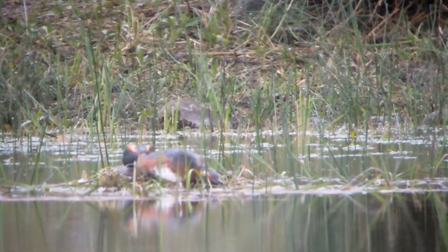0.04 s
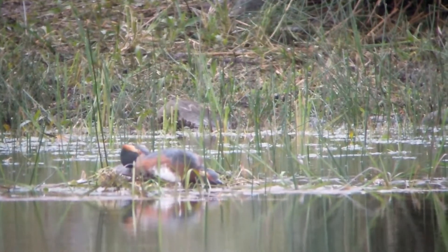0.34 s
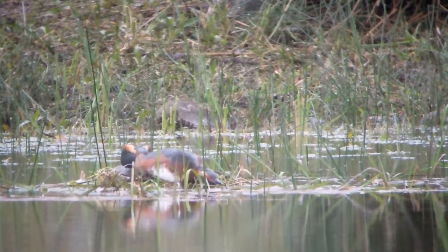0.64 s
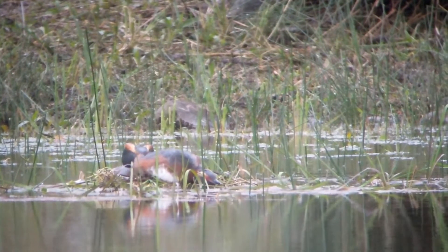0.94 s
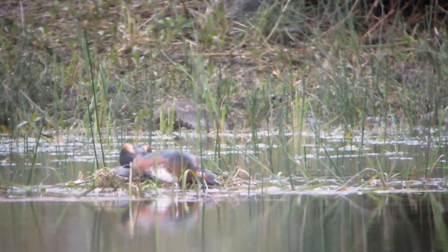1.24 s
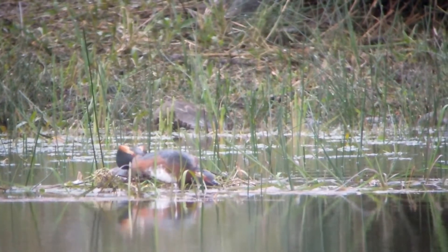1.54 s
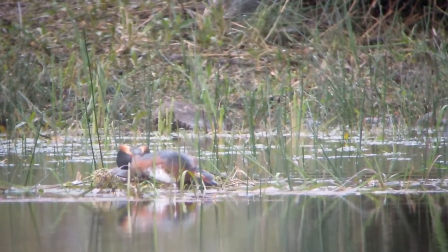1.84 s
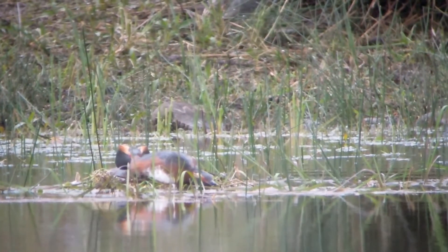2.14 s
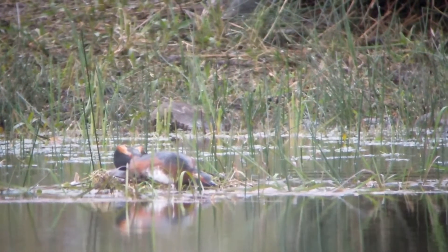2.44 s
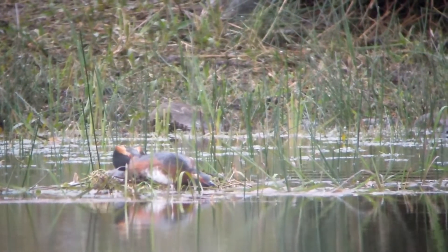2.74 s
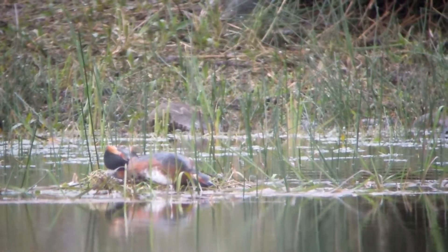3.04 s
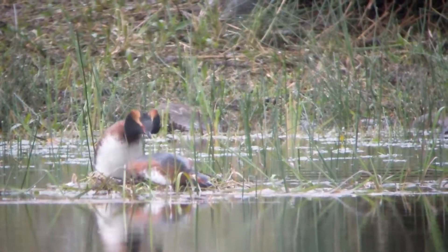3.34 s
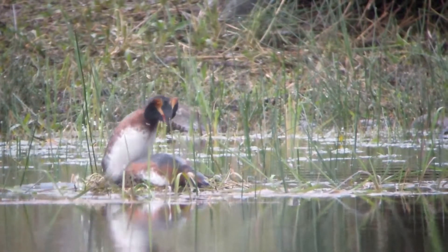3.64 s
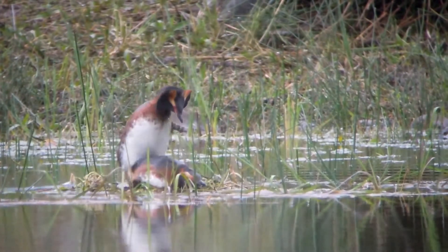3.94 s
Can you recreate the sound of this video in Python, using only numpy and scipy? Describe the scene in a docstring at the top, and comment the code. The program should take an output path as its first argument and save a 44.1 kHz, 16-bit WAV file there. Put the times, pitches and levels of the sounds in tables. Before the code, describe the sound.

A water bird gives one clear arched call over steady wind and faint distant chirps.

```python
"""A water bird gives one clear call at a reedy lake: its pitch climbs, breaks upward, holds and drops.
The call is a clean tone with two overtones, and it echoes softly off the reeds and trees.
Small birds whistle and chirp far away, over steady wind and a low rumble of air on the microphone.
There are two faint ticks, a soft knock and a far low hoot; the whole scene fades in."""
import sys
import numpy as np
from scipy import signal
from scipy.fft import rfft, irfft
from scipy.io import wavfile
from scipy.ndimage import uniform_filter1d

SR = 44100
rng = np.random.default_rng(int(sys.argv[2]) if len(sys.argv) > 2 else 0)


def file_out(sig):
    """Save sig as 16-bit WAV at sys.argv[1]."""
    # one column per channel
    cols = np.atleast_2d(sig).T
    # limit, then scale
    lim = np.clip(cols, -1, 1)
    pcm = np.round(lim * 32767).astype(np.int16)
    wavfile.write(sys.argv[1], SR, pcm)


N = 176400

# how strong the wind is from bass to treble: frequency_hz, level_db
WIND_COLOUR = [(15, -31), (25, -1), (54, 0), (129, -3), (237, 0), (309, -4), (436, -4), (498, -6), (991, 0),
               (1190, -3), (1330, -7), (1470, -6), (2140, -13), (3010, -13), (3440, -17), (3830, -15),
               (5540, -20), (14000, -23)]
# how wide the wind sounds (0 is widest): frequency_hz, side_minus_mid_db
WIND_WIDTH = [(60, -10), (110, -8), (200, -8), (370, -6), (680, -9), (1250, -9), (2310, -4), (4230, -1),
              (7780, 0), (14300, 0)]
WIND_DB, WIND_EASE_DB_PER_S, WIND_WAVER_DB = -48.9, -.5, .5
# gusts of air hitting the microphone: time_s, level_db
GUSTS = [(0, -42), (.4, -40), (.8, -48), (1.3, -55), (2.2, -64), (3.1, -62), (3.25, -52), (3.42, -59),
         (3.6, -52), (3.85, -53), (3.9, -47), (4, -59)]
# how strong their rumble is from bass to treble: frequency_hz, level_db
RUMBLE_COLOUR = [(15, -5), (30, -3), (42, -5), (55, 1), (80, -10), (130, -17), (240, -16.5), (400, -34),
                 (2000, -80)]

# chirps of far songbirds: start_s, length_s, first_hz, middle_hz, last_hz, level_db
CHIRPS = [ (.325, .04, 4600, 5100, 5600, -62), (.495, .045, 4400, 5100, 5800, -62),
          (.703, .06, 3700, 4750, 5600, -56.5), (.868, .064, 3650, 4700, 5800, -56),
          (1.005, .08, 3700, 4550, 6000, -57), (1.06, .09, 3050, 2650, 2430, -61),
          (1.16, .052, 3850, 4030, 4100, -58), (1.21, .078, 4400, 4300, 3600, -62),
          (1.275, .025, 3600, 3850, 4600, -54), (1.38, .036, 3900, 4100, 4650, -61),
          (1.405, .022, 4600, 4200, 3700, -61), (1.442, .022, 3100, 3850, 4600, -50),
          (1.505, .05, 2250, 2400, 2500, -59), (1.495, .046, 3950, 4150, 3650, -62),
          (1.59, .1, 4650, 4400, 4400, -55), (1.612, .028, 3550, 3680, 4000, -60),
          (1.628, .016, 2500, 2750, 3050, -53), (1.64, .055, 2800, 2880, 3150, -60),
          (1.81, .036, 2980, 3060, 3400, -58), (2.105, .085, 2950, 2780, 3100, -61),
          (2.195, .042, 3750, 3820, 4050, -57), (2.44, .075, 3300, 3020, 3100, -61),
          (2.595, .05, 2550, 2300, 2150, -55), (2.72, .06, 2550, 2340, 2750, -53),
          (2.785, .12, 2880, 3080, 3080, -61), (3.44, .07, 4250, 4430, 4550, -62),
          (3.508, .058, 2600, 2270, 2230, -51), (3.513, .05, 4200, 3900, 3350, -56),
          (3.595, .066, 2600, 2270, 2170, -50), (3.668, .042, 2000, 2250, 2280, -53),
          (3.662, .048, 4050, 3850, 3300, -57), (3.703, .046, 3150, 3200, 3900, -55),
          (3.735, .05, 3800, 4150, 4450, -59), (3.928, .04, 3400, 3800, 3400, -54),
          (3.968, .03, 4450, 4380, 4300, -52)]
# their long rising whistles: start_s, length_s, level_db
WHISTLES = [(3.19, .225, -52), (3.795, .225, -50.5)]
# the pitches each whistle slides through: first_hz, middle_hz, last_hz
WHISTLE_PITCHES = (2230, 2455, 2550)
CHIRP_GAIN_DB, CHIRP_FLUTTER_DB, WHISTLE_FLUTTER_DB, SONG_ECHO_DB = -3, 2.2, .9, -6
CHATTER_DB, CHATTER_HZ, CHATTER_OCTAVES, CHATTER_BEND = -70, 3800, .3, .08

# small ticks in the reeds: start_s, level_db
TICKS = [(.636, -35), (2.601, -42)]
# how strong a tick is from bass to treble: frequency_hz, level_db
TICK_COLOUR = [(500, -8), (2500, 0), (4000, -3), (6000, -1), (14000, -8)]
# the tones that ring in the knock (ring_s is the time to fade by 60 dB): pitch_hz, level_db, ring_s
KNOCK_TONES = [(220, -6, .03), (350, 0, .035), (450, -5, .02)]

# the path of the water bird's call: time_s, pitch_hz, level_db
CALL_PATH = [(1.841, 1912, -55.2), (1.856, 2123, -42.3), (1.872, 2285, -40.1), (1.883, 2436, -39.5),
             (1.888, 2726, -39.8), (1.905, 2877, -37.7), (1.922, 3002, -35.8), (1.936, 3059, -39.0),
             (1.96, 3082, -37.0), (1.998, 3083, -35.7), (2.021, 3035, -38.8), (2.055, 2957, -33.3),
             (2.072, 2840, -35.3), (2.078, 2641, -36.4), (2.081, 2350, -43.3), (2.086, 2172, -46.7),
             (2.092, 2100, -57.8)]
# resonances that set an overtone's strength next to the main tone: frequency_hz, gain_db
CALL_RESONANCES = [(3900, -10), (4600, -9), (5300, -15), (5900, -18), (6080, -14), (6160, -23), (6600, -31),
                   (7300, -25), (8500, -31), (9000, -20), (9200, -17), (10500, -40)]
CALL_GAIN_DB, CALL_FLUTTER_DB, OVERTONE_FLUTTER_DB = -.3, .4, 1.4
CALL_PAN_DB, OVERTONE_PAN_DB, CALL_ECHO_DB = -.8, 3.5, -24

# the fade-in, applied on top of all the levels above: time_s, gain_db
FADE_IN = [(0, -27), (.23, -22.5), (.54, -15), (.9, -7.5), (1.25, -1.5), (1.6, 0)]


def gain(db):
    """Turn decibels into a number to multiply by."""
    return 10 ** (np.asarray(db) / 20)


def curve(rows, at, column=1):
    """Read one column of a table, joining its points with straight lines."""
    rows = np.array(rows, float)
    return np.interp(at, rows[:, 0], rows[:, column])


def level_at(rows, hz):
    """Look up decibels by frequency, giving every octave equal room."""
    rows = np.array(rows, float)
    return np.interp(np.log(np.maximum(hz, 1)), np.log(np.maximum(rows[:, 0], 1)), rows[:, 1])


def frequencies():
    """The frequency of each slot in the spectrum of the whole sound."""
    return np.arange(N // 2 + 1) * SR / N


def noise(colour):
    """Noise of strength 1 with the given balance of bass and treble."""
    hiss = irfft(rfft(rng.standard_normal(N)) * gain(level_at(colour, frequencies())), N)
    return hiss / hiss.std()


def wobble(rate):
    """A smooth random wobble of size near 1, changing about `rate` times a second."""
    hold = max(int(SR / rate), 2)
    steps = np.repeat(rng.standard_normal(N)[:N // hold + 1], hold)
    return 1.3 * uniform_filter1d(uniform_filter1d(steps, hold), hold)[:N]


def pan(db):
    """Left and right gains that make the left ear louder by `db`."""
    return gain(np.array([[db], [-db]]) / 2)


def shore_echo(sound, ring_s=.4):
    """Reeds and trees scatter a sound into a soft echo, different at each ear."""
    t = np.arange(SR) / SR
    tail = rng.standard_normal((2, SR)) * np.exp(-np.log(1000) * t / ring_s)
    tail /= np.sqrt(np.sum(tail ** 2, axis=1, keepdims=True))
    return signal.fftconvolve(sound[None], tail, axes=1)[:, :N]


def note(t, start_s, length_s, pitches_hz, db, jitter=.004, edge_share=.3):
    """A nearly pure note that bends through three pitches, starting and ending softly."""
    sound = np.zeros(N)
    inside = (t > start_s) & (t < start_s + length_s)
    progress = (t[inside] - start_s) / length_s
    waver = np.interp(progress, np.linspace(0, 1, num=20), rng.standard_normal(20))
    arch = np.polyfit([0, .5, 1], pitches_hz, 2)
    hz = np.polyval(arch, progress) * (1 + jitter * waver)
    edges = np.sin(np.pi / 2 * np.clip(np.minimum(progress, 1 - progress) / edge_share, 0, 1))
    sound[inside] = np.sqrt(2) * gain(db) * edges * np.sin(2 * np.pi * np.cumsum(hz) / SR)
    return sound


def wind(t):
    """Wind in the trees: a broad rush that slowly eases, each octave wavering a little."""
    hz = frequencies()
    colour = gain(level_at(WIND_COLOUR, hz)) * hz / np.hypot(hz, 15)  # thins out below 15 Hz
    mid, side = rfft(rng.standard_normal((2, N))) * colour  # what the ears share, and how they differ
    side = side * gain(level_at(WIND_WIDTH, hz))
    ears = np.array([mid + side, mid - side]) / irfft(mid, N).std()
    octave = np.clip(np.log2(np.maximum(hz, 1) / 50), 0, 8)
    bands = [irfft(ears * np.maximum(1 - np.abs(octave - k), 0), N) for k in range(9)]
    rush = sum(band * gain(WIND_WAVER_DB * wobble(9)) for band in bands)
    return rush * gain(WIND_DB + WIND_EASE_DB_PER_S * (t - 2)) * pan(db=-.6)


def air_rumble(t):
    """Gusts push on the microphone and make a low rumble."""
    return noise(RUMBLE_COLOUR) * gain(curve(GUSTS, t))


def far_hoot(t):
    """A soft low note, heard only as its echo."""
    return shore_echo(note(t, start_s=2.25, length_s=.42, pitches_hz=(415, 435, 400), db=-61))


def far_chatter(t, count=60, note_s=.04):
    """The farthest birds sing tiny notes of random pitch and bend."""
    chatter = np.zeros(N)
    starts = rng.uniform(0, N / SR, count)
    for start_s, (height, strength, *bend) in zip(starts, rng.standard_normal((count, 5))):
        centre_hz = CHATTER_HZ * 2 ** (CHATTER_OCTAVES * np.clip(height, -2, 1))
        pitches_hz = centre_hz * (1 + CHATTER_BEND * np.array(bend))
        chatter += note(t, start_s, note_s, pitches_hz, CHATTER_DB + 2 * strength)
    return chatter


def songbirds(t):
    """Far chirps and whistles, made unsteady and echoing by the trees."""
    chirps = sum(note(t, start_s, length_s, pitches_hz, CHIRP_GAIN_DB + db)
                 for start_s, length_s, *pitches_hz, db in CHIRPS)
    song = (chirps + far_chatter(t)) * gain(CHIRP_FLUTTER_DB * wobble(160))
    whistles = sum(note(t, start_s, length_s, WHISTLE_PITCHES, db) for start_s, length_s, db in WHISTLES)
    song += whistles * gain(WHISTLE_FLUTTER_DB * wobble(60))
    return song + gain(SONG_ECHO_DB) * shore_echo(song)


def reed_ticks(t, decay_s=.002):
    """Very short, bright snaps of noise in the reeds."""
    loudness = sum(gain(db) * (t >= start_s) * np.exp(-np.abs(t - start_s) / decay_s)
                   for start_s, db in TICKS)
    return loudness * np.array([noise(TICK_COLOUR), noise(TICK_COLOUR)])


def knock(t, start_s=2.198, gain_db=-38):
    """One soft, hollow knock: a few low tones start together and die away fast."""
    age = np.maximum(t - start_s, 0)
    return sum(gain(gain_db + db) * np.sin(2 * np.pi * hz * age) * np.exp(-np.log(1000) * age / ring_s)
               for hz, db, ring_s in KNOCK_TONES)


def water_bird(t, jitter=.0015):
    """A clean, slightly unsteady tone whose two overtones swell as they pass through resonances."""
    hz = curve(CALL_PATH, t) * (1 + jitter * wobble(200))
    start_s, end_s = CALL_PATH[0][0], CALL_PATH[-1][0]
    edges = np.clip(np.minimum(t - start_s, end_s - t) / .003, 0, 1)  # on and off in 3 ms
    level_db = curve(CALL_PATH, t, column=2) + CALL_GAIN_DB + CALL_FLUTTER_DB * wobble(120)
    loudness = np.sqrt(2) * edges * gain(level_db)
    phase = 2 * np.pi * np.cumsum(hz) / SR
    voice = loudness * np.sin(phase) * pan(CALL_PAN_DB)
    for multiple in (2, 3):  # overtones at two and three times the pitch
        flutter_db = OVERTONE_FLUTTER_DB * np.array([wobble(100), wobble(100)])
        strength = gain(level_at(CALL_RESONANCES, multiple * hz) + flutter_db)
        voice += loudness * strength * np.sin(multiple * phase) * pan(OVERTONE_PAN_DB)
    return voice + gain(CALL_ECHO_DB) * shore_echo(voice.mean(axis=0))


def scene():
    """Add up the birds, the small noises and the wind."""
    t = np.arange(N) / SR
    return water_bird(t) + songbirds(t) + far_hoot(t) + reed_ticks(t) + knock(t) + wind(t) + air_rumble(t)


def record(dry):
    """Fade the sound in and cut the treble above 14200 Hz."""
    faded = dry * gain(curve(FADE_IN, np.arange(N) / SR))
    treble_cut = signal.ellip(12, .1, 70, 14200, fs=SR, output="sos")
    return signal.sosfilt(treble_cut, faded)


dry = scene()
out = record(dry)
file_out(out)
```